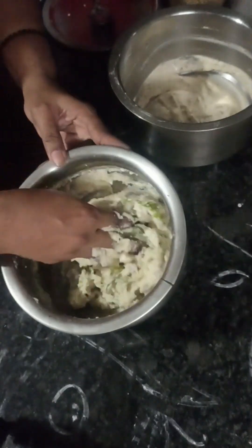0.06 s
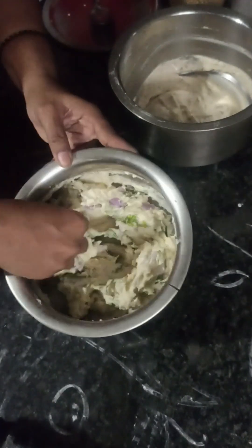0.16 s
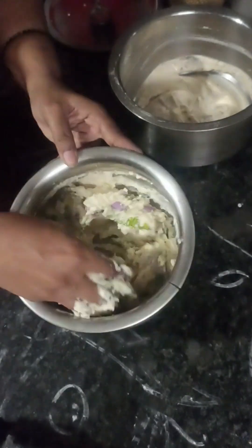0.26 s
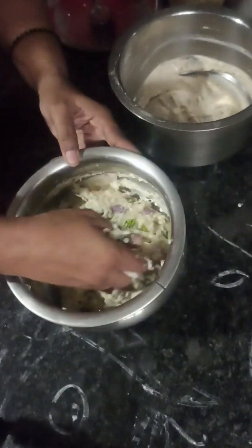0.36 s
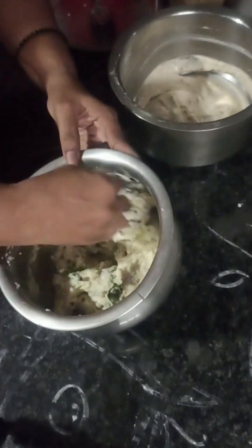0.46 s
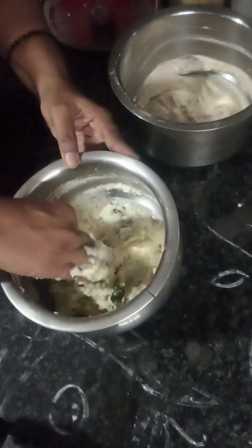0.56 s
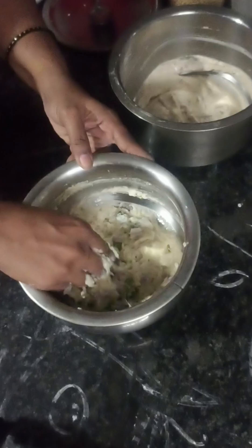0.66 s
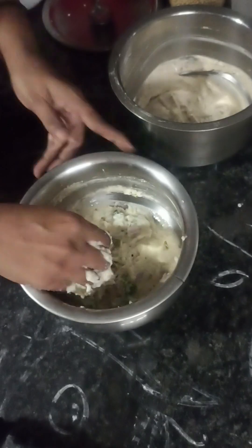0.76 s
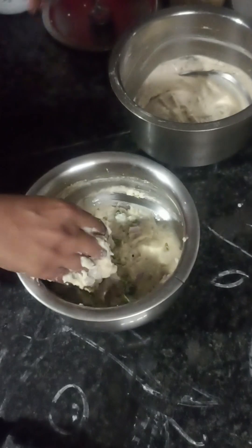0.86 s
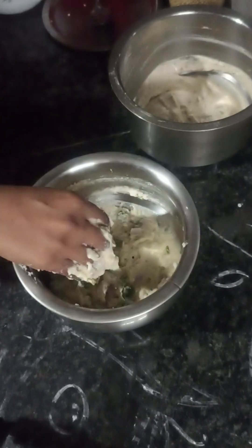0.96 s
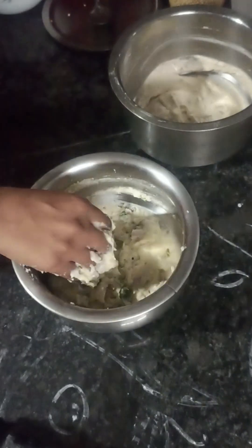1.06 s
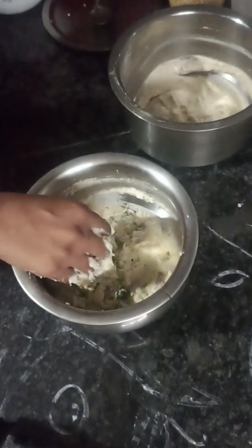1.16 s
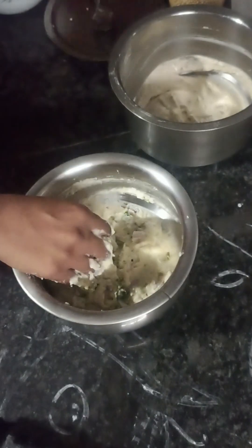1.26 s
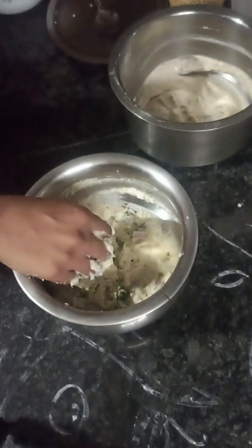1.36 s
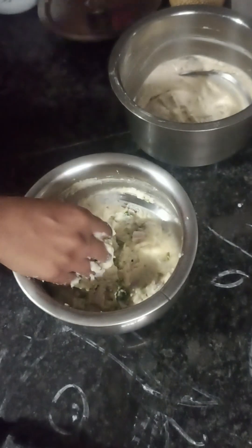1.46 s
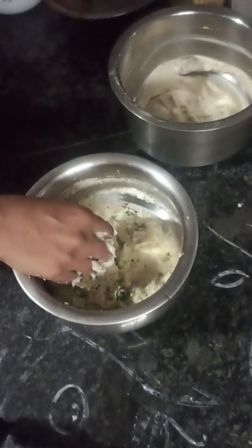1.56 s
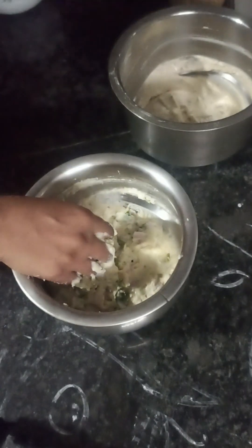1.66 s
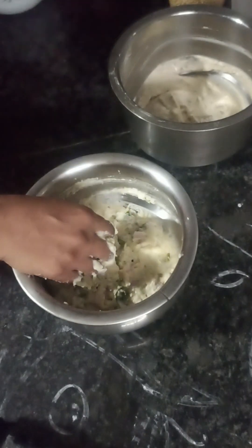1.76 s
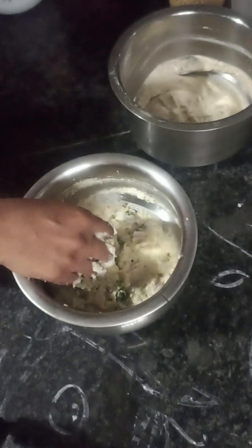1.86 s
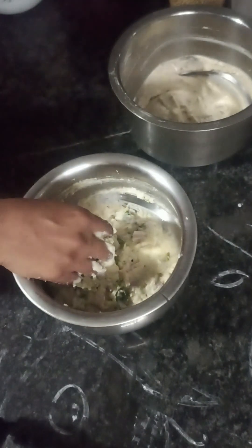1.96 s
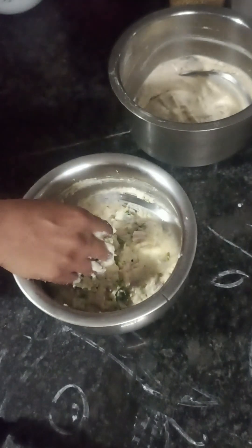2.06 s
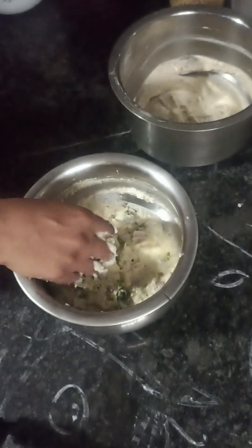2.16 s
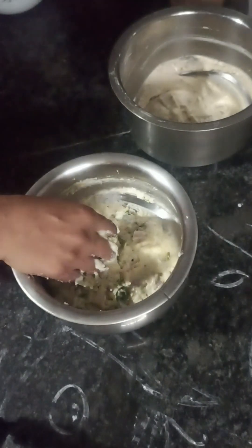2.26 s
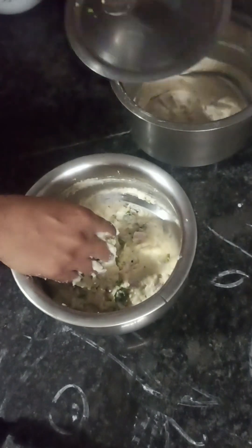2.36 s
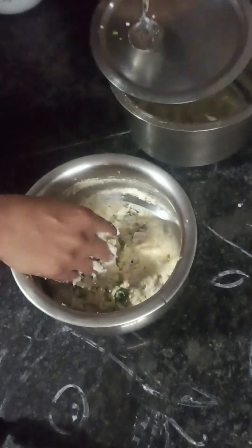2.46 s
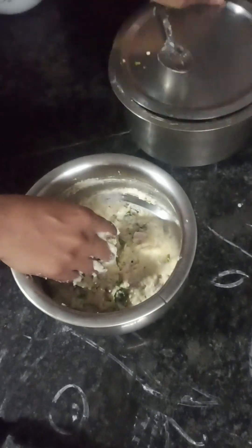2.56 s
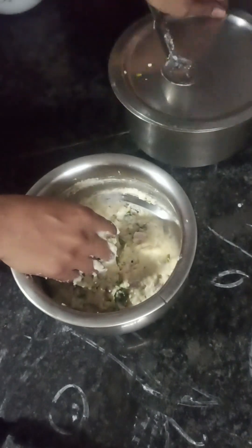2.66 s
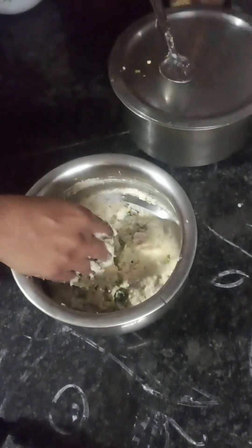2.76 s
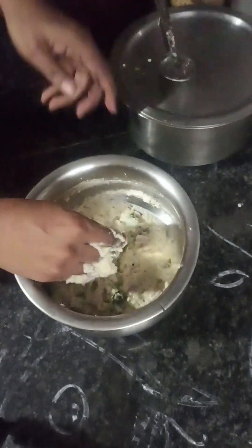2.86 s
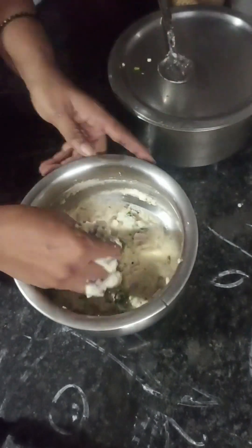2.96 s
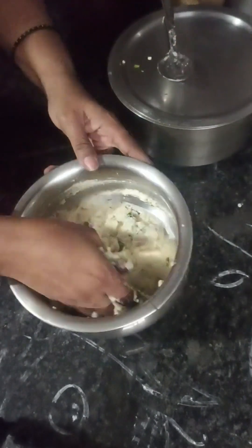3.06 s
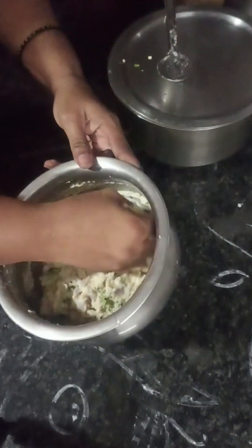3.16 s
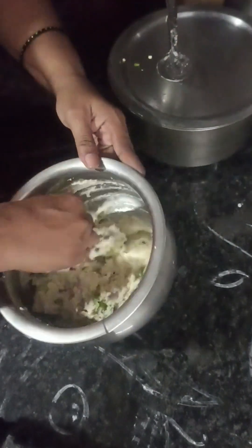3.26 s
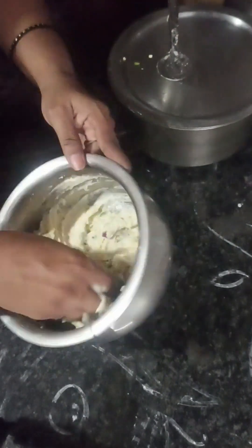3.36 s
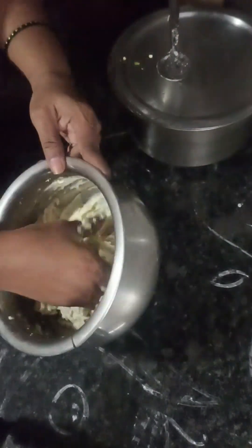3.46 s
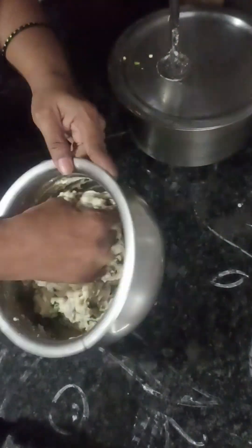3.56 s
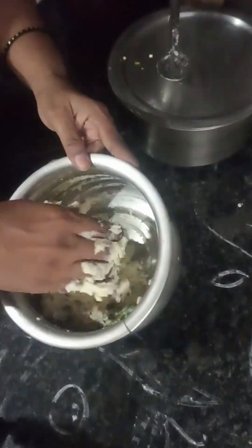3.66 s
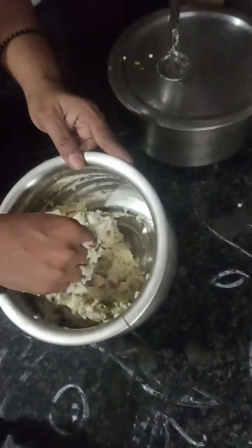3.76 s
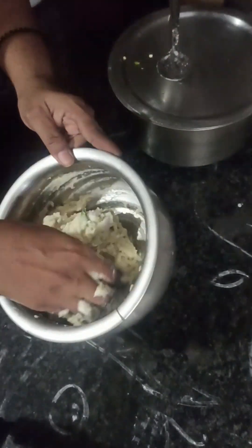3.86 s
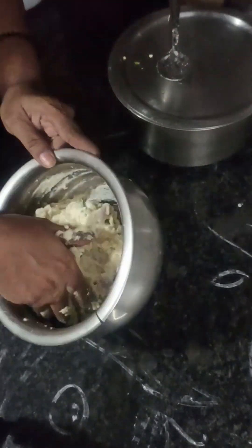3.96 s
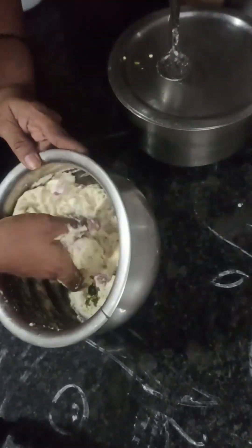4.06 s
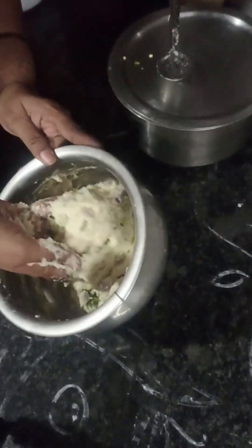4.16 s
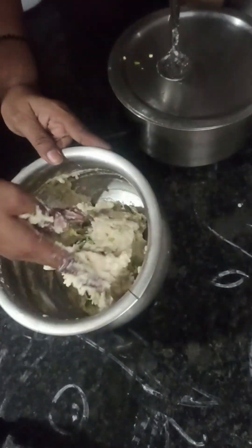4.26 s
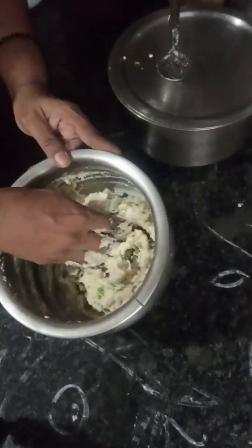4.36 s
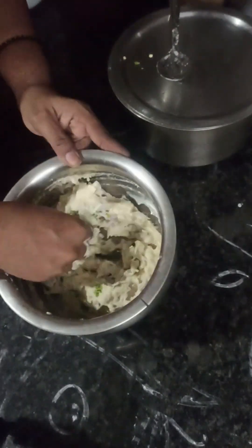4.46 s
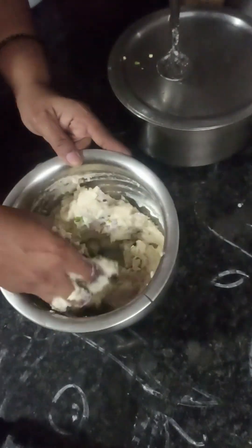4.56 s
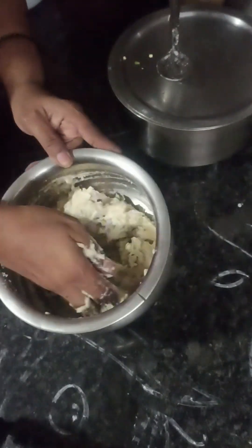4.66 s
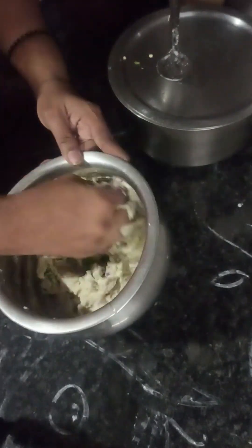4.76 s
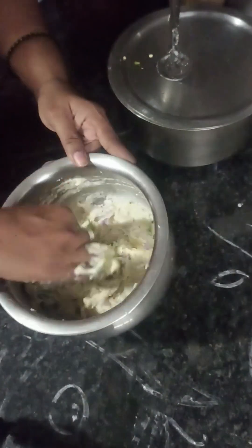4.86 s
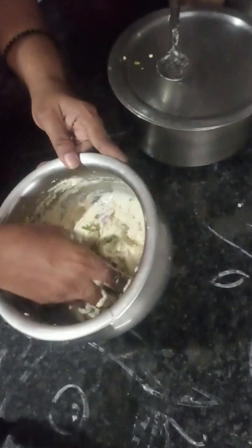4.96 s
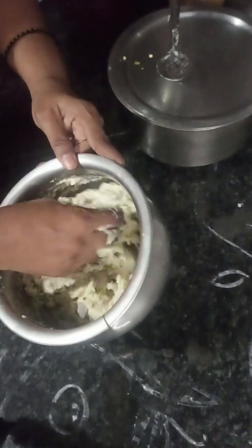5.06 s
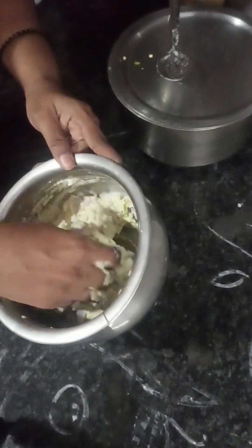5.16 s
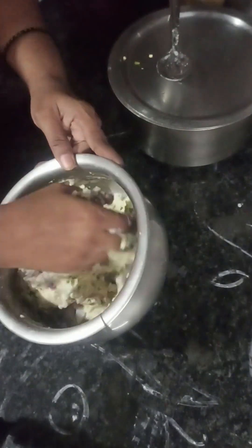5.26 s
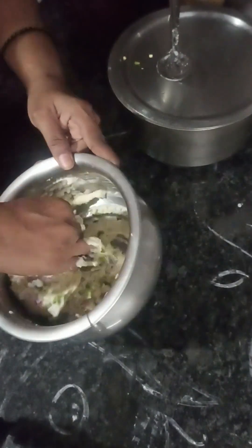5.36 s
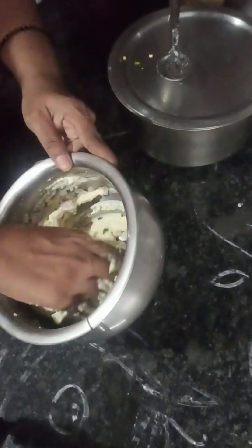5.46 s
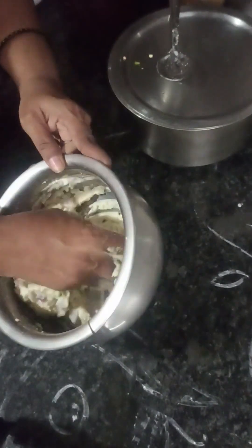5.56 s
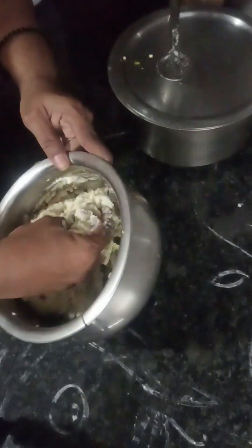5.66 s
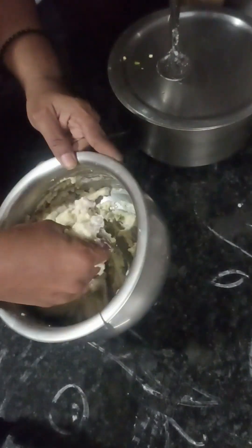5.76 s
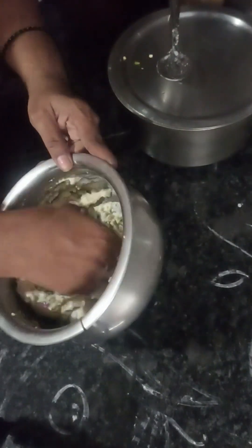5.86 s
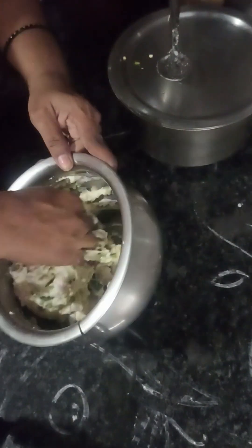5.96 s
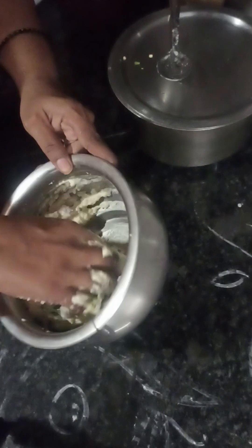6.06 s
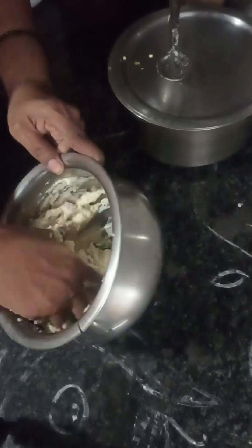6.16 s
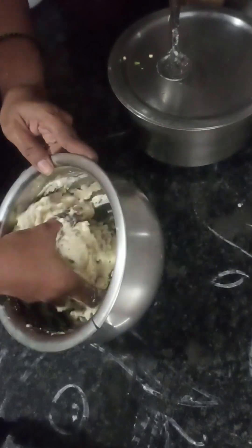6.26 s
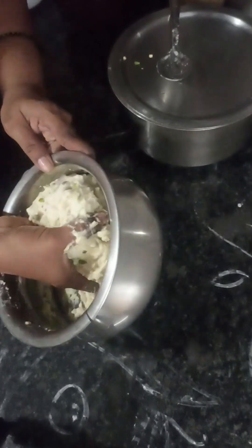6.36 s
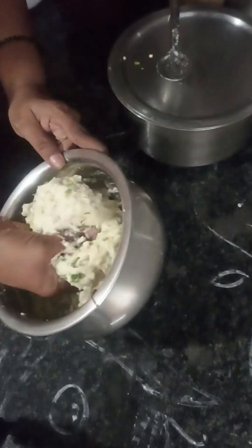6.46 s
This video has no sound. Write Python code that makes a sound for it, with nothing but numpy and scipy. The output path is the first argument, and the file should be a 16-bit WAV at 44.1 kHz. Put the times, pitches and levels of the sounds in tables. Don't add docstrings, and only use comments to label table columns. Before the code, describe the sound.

A small kitchen with a steady, low room hum, heard from within arm's reach in stereo. From 0 to 0.9 s a hand kneads thick batter: faint sticky crackles, tiny wet snaps and a dull low bowl thud at 0.7. A faint bird trills far outside at about 0.8 and 1.7. From 1.2 to 1.6 a spoon buzzes and ticks on a steel lid, slightly left. At 2.0 the lid gives a sharp bright double knock, slightly right. It touches the pot dully at 2.45, then drops at 2.53 to 2.7, the loudest clatter, low pot ring under bright shimmer. The bowl thuds firmly around 3.0. Soft kneading resumes until 6.4, with sparse wet snaps, peeling films and small hollow pops, while distant bird chirps run mostly from 3.6 to 4.5. At 6.49 a heavy metal slam starts and is cut off.

```python
import sys
import numpy as np
from scipy import signal
from scipy.fft import rfft, irfft, next_fast_len
from scipy.io import wavfile
from scipy.ndimage import uniform_filter1d

SR = 44100
rng = np.random.default_rng(int(sys.argv[2]) if len(sys.argv) > 2 else 0)


def store_wav(level_fs):
    pcm = np.round(np.clip(np.atleast_2d(level_fs), -1, 1) * 32767)
    wavfile.write(sys.argv[1], SR, pcm.T.astype(np.int16))


def ratio(d):
    e = np.asarray(d, float) / 20
    return 10 ** e


N = 286650


def read(points, hz):
    f, value = np.transpose(points)
    return np.interp(np.log(hz + 1), np.log(f + 1), value)


def evened(x):
    return x / np.sqrt(np.mean(x ** 2) + 1e-20)


def unit(x):
    return x / np.linalg.norm(x)


def add(mix, s, sound):
    part = mix[..., round(s * SR):][..., :sound.shape[-1]]
    part += sound[..., :part.shape[-1]]


def diffuse(likeness):
    a, b = rfft(rng.standard_normal((2, N)))
    same = np.clip(read(likeness, np.fft.rfftfreq(N, 1 / SR)), -1, 1)
    return irfft([a, same * a + np.sqrt(1 - same ** 2) * b], N)


def coloured(x, taps):
    return signal.oaconvolve(x, taps[None], axes=1)[:, :N]


def halves(x, hz):
    return [signal.sosfilt(signal.butter(4, hz, side, fs=SR, output="sos"), x) for side in ("low", "high")]


def whistle(pitch, level):
    return level * np.sin(2 * np.pi * np.cumsum(pitch) / SR)


def response(tone, rings=(), ring_db=0.):
    hz = np.fft.fftfreq(8192, 1 / SR)
    log_gain = read(tone, abs(hz)) * np.log(10) / 20
    body = np.exp(log_gain - 1j * signal.hilbert(log_gain).imag)
    taps, t = unit(np.fft.ifft(body).real[:4096]), np.arange(4096) / SR
    for (f, width, db), extra_db in zip(rings, ring_db * np.ones(len(rings))):
        ring = np.exp(-np.pi * width * t) * np.sin(2 * np.pi * f * t)
        taps = taps + ratio(db + extra_db) * unit(ring)
    return unit(taps)


# freq_hz, level_db per Hz
HUM = [(18, -48.5), (30, -22), (134, -1.0), (413, 1.5), (509, -7.5), (838, -4.0), (1310, -10.5),
       (3450, -16), (3830, -27.0), (6650, -26.5), (7780, -35), (9860, -46.0), (12200, -49.0), (15800, -60),
       (16500, -22)]
# freq_hz, width_hz, level_db
HUM_MODES = [(163, 9.1, -8.5), (214.8, 8, -6), (275, 210, -40), (316, 61, -9.5), (424.6, 9.6, -13),
             (760, 410, -17)]
# freq_hz, likeness
SAME = [(60, 0.9), (180, 1), (550, 0.46), (1650, -0.13), (4970, -0.039), (15000, 0.083)]


def kitchen():
    swell = evened(uniform_filter1d(uniform_filter1d(rng.standard_normal(N), 2500), 2500))
    return ratio(-52 + 0.2 * swell) * coloured(diffuse(SAME), response(HUM, HUM_MODES, -4.0))


# time_s,
# level_db
KNEAD = [(0.0, -68.5), (0.72, -67.5), (0.92, -73), (1.16, -72), (1.23, -65.5), (1.5, -60), (1.63, -70.5),
         (1.99, -68), (2.35, -71.5), (2.62, -52), (2.73, -63.5), (2.82, -71), (2.95, -66), (3.11, -68),
         (3.87, -70.5), (4.13, -68.5), (6.04, -69), (6.5, -68)]


def kneading():
    return ratio(np.interp(np.arange(N) / SR, *np.transpose(KNEAD)))


# freq_hz, level_db per Hz
STICKY = [(880, -28), (1500, 10), (1810, 8.5), (3060, -2.5), (3310, 0.5), (3620, 1.5), (3810, -2.5),
          (7460, -10), (12400, -3), (16000, -17)]
# start_s, peak_db, dull_db re peak
SNAPS = [(0.1416, -56, -18), (0.239, -54, -15), (0.2614, -64, -19), (0.5333, -55, -9), (0.5652, -44.5, -33),
         (0.6995, -46.5, -24), (2.86, -53, -15), (2.898, -50, -24), (3.1613, -55, -18), (3.2675, -51, -20),
         (3.3056, -58.5, -4), (3.621, -50, -18), (3.6426, -53, -20), (3.6656, -45, -34), (3.8382, -56, -16),
         (3.9853, -58, -10), (4.0326, -60, -3), (4.067, -49.5, -9), (4.1091, -46, -9), (4.25, -52.5, -10),
         (4.5526, -61, -19), (4.5945, -48.5, -21), (0.6285, -58, -22), (1.926, -56, -22),
         (4.6409, -62, -14), (4.9831, -57, -16), (5.1542, -54, -19), (4.8554, -52, -18), (4.9147, -53, -20),
         (5.1696, -54, -22), (5.407, -53, -7), (5.9838, -58, -8), (6.0312, -54, -15)]
# start_s, peak_db, dull_db re peak, peel_s
PEELS = [(0.4808, -57, -3, 0.013), (0.8494, -59, -18, 0.039), (1.6214, -45, -32, 0.0026),
         (1.6456, -33.5, -47, 0.005), (1.818, -45.5, -32, 0.015), (2.697, -54, 7, 0.0027),
         (2.756, -43, -7.5, 0.0046), (2.7755, -67, -18, 0.0018), (2.9418, -39.5, -29, 0.0024),
         (2.9644, -54, -23, 0.007), (3.502, -74, 19, 0.0081), (4.7301, -56, -11, 0.037),
         (5.0914, -59.5, 4, 0.014), (6.2317, -72, 18.5, 0.019)]


def batter():
    snap_peel_s = 0.0011
    effort, t = kneading(), np.arange(SR // 4) / SR
    grains = ratio(0.45 * np.minimum(rng.exponential(1, N), 5)) * (rng.random(N) < 250 / SR)
    clumps = evened(signal.lfilter([1], [1, -np.exp(-1 / (0.02 * SR))], grains) + 1.5)
    bright, dull, cracks = effort * clumps, 0.67 * effort * clumps, np.zeros(N)
    for s, db, dull_db, peel in [*[(*row, snap_peel_s) for row in SNAPS], *PEELS]:
        wet_t60 = 0.052 + 4.2 * peel
        wet = ratio(-60 * np.maximum(t - peel, 0) / max(wet_t60, .005)) * (1 - np.exp(-t / (0.072 * peel)))
        burst = ratio(db - 8.5) * (wet + 0.69 * np.exp(-t / 0.002))
        add(bright, s, burst)
        add(dull, s, ratio(dull_db) * burst)
        if peel == snap_peel_s:
            add(cracks, s, ratio(db + dull_db + 21.0) * np.hanning(5))
    low, high = halves(diffuse(SAME), 5400)
    return coloured(bright * high + 2.0 * dull * low, response(STICKY)) - cracks


def tearing():
    out, t = np.zeros((2, N)), np.arange(200) / SR
    size = kneading() * ratio(2.2 * np.minimum(rng.exponential(1, N), 3)) * (rng.random(N) < 70 / SR)
    kind = rng.integers(0, 7, N)
    for k, hz in enumerate(np.geomspace(5500, 15000, num=7)):
        tick = rng.standard_normal((2, 200)) * np.exp(-t / 0.0012)
        band = signal.butter(1, [hz * .8, hz * 1.2], "band", fs=SR, output="sos")
        tick = signal.sosfilt(band, tick)
        tick = tick / np.linalg.norm(tick[0])
        out += ratio(14.5) * signal.oaconvolve((size * (kind == k))[None], tick, axes=1)[:, :N]
    return out


# start_s, peak_db, pitch_hz, t60_s
THUDS = [
    (0.267, -47, 164, 0.091),
    (0.712, -37.5, 153, 0.15),
    (2.987, -36.5, 154, 0.086),
    (3.023, -29, 166, 0.11),
    (3.071, -36.5, 153, 0.19),
    (3.492, -54.5, 149, 0.79),
    (4.215, -63, 200, 0.084),
]


def bowl():
    out, t = np.zeros(N), np.arange(SR // 3) / SR
    for s, db, hz, t60 in THUDS:
        overtone = 0.77 * np.sin(2 * np.pi * 1.25 * hz * t) * ratio(-60 * t / 0.061)
        ring = np.sin(2 * np.pi * hz * t) + overtone
        add(out, s, ratio(db - 60 * t / t60) * ring * (1 - np.exp(-t / 0.0042)))
    return out


# start_s, peak_db, pitch_hz, t60_s
POPS = [(3.5015, -43.5, 600, 0.026), (5.095, -51, 2450, 0.03), (4.8648, -46, 1460, 0.016),
        (5.3477, -50, 3020, 0.016), (5.4998, -52, 1050, 0.022), (5.6144, -49, 1020, 0.023),
        (5.671, -49.5, 1600, 0.028), (6.2507, -46, 1390, 0.018), (0.4898, -44.5, 2870, 0.014),
        (5.3644, -51.5, 3100, 0.024), (5.9928, -58, 3170, 0.025)]


def pops():
    out, t = np.zeros(N), np.arange(3000) / SR
    for s, db, hz, t60 in POPS:
        note = np.sin(2 * np.pi * hz * (t + 4.3 * t ** 2)) * (1 - np.exp(-t / 0.00088))
        add(out, s, ratio(db + 3.0 - 60 * t / t60) * note)
    return out


def trill(length, db, hz):
    rise_s, pulses_per_s, dip_db, fade_db_per_s = 0.05, 15, 4, 55
    t = np.arange(0, length, 1 / SR)
    rise, late = np.minimum(t / rise_s, 1), np.maximum(t - rise_s, 0)
    dips_db = dip_db * np.sin(np.pi * pulses_per_s * late) ** 2
    level = np.sqrt(rise) * ratio(db - dips_db - fade_db_per_s * late)
    return whistle(hz * (1 - 0.035 * (1 - rise)), level)


CHIRP_S = 0.036


def chirp(db, hz, tail_db):
    tail_s = 0.03
    t = np.arange(0, CHIRP_S + tail_s, 1 / SR)
    top, tail = np.minimum(t / CHIRP_S, 1), np.clip((t - 0.75 * CHIRP_S) / tail_s, 0, 1)
    arch = 0.04 + 0.05 * (hz > 3270)
    pitch = hz * (1 - arch * (2 * top - 1) ** 2 - 0.22 * tail)
    level = np.sin(np.pi * top) + ratio(tail_db) * np.sin(np.pi * tail ** 1.6)
    return whistle(pitch, ratio(db) * level)


# start_s, length_s, peak_db, pitch_hz
TRILLS = [
    (0.77, 0.29, -59.5, 3390),
    (1.705, 0.24, -64, 2590),
]
# centre_s, peak_db, pitch_hz, tail_db re peak
CHIRPS = [(2.168, -59, 3160, -20), (2.207, -60, 3170, -22), (2.362, -57, 3130, -22), (3.6, -58, 3130, -5),
          (3.675, -61, 3070, 1), (3.76, -62, 3040, 4), (3.855, -66, 3070, 8), (3.954, -58, 3140, -1),
          (4.038, -60, 3070, -14), (4.114, -59, 3160, 2), (4.204, -54, 3200, -1.5),
          (4.294, -53.5, 3180, -12), (4.384, -55, 3330, -14), (4.467, -57, 3270, -19),
          (4.615, -76, 3000, 15)]


def bird():
    out = np.zeros(N)
    for s, *note in TRILLS:
        add(out, s, trill(*note))
    for s, *note in CHIRPS:
        add(out, s - CHIRP_S / 2, chirp(*note))
    flutter = evened(uniform_filter1d(rng.standard_normal(N), round(0.006 * SR)))
    out = out * ratio(3 * flutter)
    echoes = rng.standard_normal((2, 3000)) * ratio(-60 * np.arange(3000) / (.15 * SR))
    echoes = echoes / np.linalg.norm(echoes[0])
    return 0.7 * out + 0.5 * signal.oaconvolve(out[None], echoes, axes=1)[:, :N]


# freq_hz, likeness
SAME_METAL = [(60, 0.98), (180, 1), (550, 0.66), (1650, -0.48), (4970, 0.067), (15000, 0.035)]


def chatter():
    bounces = ratio(1.8 * evened(uniform_filter1d(rng.standard_normal(N), 70)))
    return np.pad(diffuse(SAME_METAL) * bounces, ((0, 0), (0, SR // 4)))


# contact_s, release_t60_s, tail_t60_s at -40 dB,
# tail growth per dB of peak, share landing at once
STRIKE_GRIP = (0.0006, 0.004, 0.04, 0, 1.2)


def steel(noise, rows, grip, tone, rings, ring_db, favour_db, tail_db, pan_db):
    contact, release, usual_t60, growth, sudden = grip
    out, t = np.zeros((2, N)), np.arange(SR // 4 if contact > .002 else SR // 20) / SR
    ring_hz, spots = np.array([ring[0] for ring in rings]), rng.standard_normal((len(rows), len(rings)))
    plate = unit(rng.standard_normal(SR // 20) * ratio(-60 * t[:SR // 20] / 0.03))
    for (s, db, body_db, hz), spot in zip(rows, spots):
        t60 = usual_t60 * np.exp(growth * (db + 40))
        after = np.maximum(t - contact, 0)
        shape = ratio(-60 * after / max(release, .002)) + ratio(tail_db - 60 * after / max(t60, .02))
        shape = shape * (1 - np.exp(-t / (0.078 * contact)))
        blow = ratio(db - 9.5) * shape * noise[:, round(s * SR):][:, :len(t)]
        landing = sudden * np.linalg.norm(blow[0]) * (t == 0)
        gripped = [(f * (1 + 0.012 * np.tanh(v)), width * (1 + 0.2 * f / 1000), level)
                   for (f, width, level), v in zip(rings, spot[::-1])]
        near = np.exp(-(np.log2(ring_hz / hz) / .22) ** 2)
        woken_db = ring_db + 1.5 * spot + favour_db * near
        low, high = halves(response(tone, gripped, woken_db), 1290)
        high = high + 0.36 * signal.oaconvolve(high, plate)[:len(high)]
        add(out, s, coloured(blow + landing, unit(high)))
        add(out, s, coloured(1.55 * blow + 2.0 * landing, ratio(body_db) * unit(low)))
    return out * ratio(np.array([[pan_db / 2], [-pan_db / 2]]))


# start_s, peak_db, body_db re peak, favoured_hz
RATTLE = [(1.193, -46.5, -31, 13450), (1.2244, -53, -23, 13450), (1.263, -44, -27, 13450),
          (1.285, -33.5, -22, 3400), (1.2865, -37.5, -14, 1620), (1.3194, -42, -21, 1710),
          (1.364, -37.5, -4, 1710), (1.3856, -39.5, -2.5, 1225), (1.424, -46, -1, 13450),
          (1.496, -48.5, -18, 13450), (1.5294, -46.5, -26, 13450), (1.5494, -46, -15, 13450),
          (1.5744, -60, -7, 13450)]
# start_s, peak_db, body_db re peak, favoured_hz
RATTLE_STRIKES = [(1.2908, -39, -13, 3400), (1.2973, -36, -17, 2455), (1.301, -47, -17, 5620),
                  (1.323, -34, -10, 1548), (1.3712, -39, -8, 2960), (1.3847, -39, 4, 1225),
                  (1.392, -41, -2, 1710), (1.3954, -43, -1, 1225), (1.4, -46, -4, 5620),
                  (1.4105, -49, -10, 3400), (1.429, -38, -14, 6500), (1.4356, -44, -8, 1225)]
# freq_hz, level_db per Hz
RATTLE_TONE = [(400, -37), (900, -19), (1500, -11), (3000, 1), (6000, -9.5), (9000, -11.5), (13000, -16.5),
               (16000, -19)]
# freq_hz, width_hz, level_db
RATTLE_RINGS = [(726, 22, -4), (1225, 22, 0.5), (1548, 26, -4), (1710, 25, 3), (2455, 46, 2),
                (2960, 42, -4), (3460, 63, -1.5), (5620, 46, -10), (6500, 50, -5), (10800, 200, -11),
                (12160, 270, -12), (13450, 110, -12), (14800, 220, -22)]
# contact_s, release_t60_s, tail_t60_s at -40 dB, tail growth per dB of peak, share landing at once
RATTLE_GRIP = (0.015, 0.078, 0.26, 0.068, 0.11)


def rattle(noise):
    buzz = steel(noise, RATTLE, RATTLE_GRIP, RATTLE_TONE, RATTLE_RINGS, -9, 8, -6, 2.4)
    return buzz + steel(noise, RATTLE_STRIKES, STRIKE_GRIP, RATTLE_TONE, RATTLE_RINGS, -8, 8, -25, 2.4)


# start_s, peak_db, body_db re peak, favoured_hz
KNOCK = [
    (2.0053, -20, -19.5, 2700),
    (2.013, -29, -21, 1420),
    (2.038, -39, -16, 3750),
    (2.062, -46, -10, 6500),
]
# start_s, peak_db, body_db re peak, favoured_hz
KNOCK_STRIKES = [
    (2.0072, -21, -9, 2700),
    (2.0125, -30, -19, 2020),
    (2.0208, -20.5, -20, 2700),
    (2.0265, -32, -8, 2700),
    (2.041, -35, -18, 3750),
]
# freq_hz, level_db per Hz
KNOCK_TONE = [(120, -55), (200, -40), (473, 12), (1420, -2), (2020, -7), (2700, 0), (3900, -2),
              (16000, -10)]
# freq_hz, width_hz, level_db
KNOCK_RINGS = [(440, 100, 2.5), (1440, 48, -12), (2020, 110, -4), (2700, 85, -0.5), (2870, 21, -9),
               (3160, 44, -9), (3750, 74, -8), (4200, 39, -16), (4480, 26, -17), (5450, 35, -20),
               (5900, 57, -18), (6800, 32, -13), (7500, 48, -28), (7900, 46, -23)]
# contact_s, release_t60_s, tail_t60_s at -40 dB, tail growth per dB of peak, share landing at once
KNOCK_GRIP = (0.014, 0.037, 0.24, 0.0042, 0.02)


def knock(noise):
    clatter = steel(noise, KNOCK, KNOCK_GRIP, KNOCK_TONE, KNOCK_RINGS, -9, 3, -8, -1.9)
    return clatter + steel(noise, KNOCK_STRIKES, STRIKE_GRIP, KNOCK_TONE, KNOCK_RINGS, -6, 7, -25, -1.9)


# start_s, peak_db, body_db re peak, favoured_hz
TOUCH = [
    (2.445, -33, 5, 500),
    (2.4492, -31.5, -0.5, 800),
    (2.4589, -37.5, 7, 484),
    (2.5044, -51, 10, 490),
]
# freq_hz, level_db per Hz
TOUCH_TONE = [(120, -53), (200, -11), (500, 3), (1000, -23), (2800, -20), (4040, -20.5), (12600, -28.5),
              (16000, -44)]
# freq_hz, width_hz, level_db
TOUCH_RINGS = [(376, 27, -1.5), (484, 37, 1.5), (793, 11, -5.5), (1240, 29, -17), (1444, 21, -15),
               (1690, 29, -13.5), (2270, 24, -16), (2815, 29, -13), (3070, 39, -23), (3500, 96, -19)]
# contact_s, release_t60_s, tail_t60_s at -40 dB, tail growth per dB of peak, share landing at once
TOUCH_GRIP = (0.002, 0.055, 0.19, -0.038, 0.1)


def touch(noise):
    return steel(noise, TOUCH, TOUCH_GRIP, TOUCH_TONE, TOUCH_RINGS, 1.7, 1.9, -5.0, -0.5)


# start_s, peak_db, body_db re peak, favoured_hz
DROP = [(2.533, -27.5, -16, 330), (2.539, -23, -16, 347), (2.5461, -22, 5.5, 422), (2.557, -18.5, -4, 500),
        (2.5686, -18.5, 1, 550), (2.584, -18, -29, 423), (2.5938, -18, -28, 2890), (2.6154, -20.5, 0, 346),
        (2.6308, -28.5, -1, 285), (2.641, -22.5, -1.5, 420), (2.658, -35.5, 4, 207), (2.6694, -39, -4, 275),
        (2.69, -51.5, 15, 285), (2.748, -48, 13, 317)]
# start_s, peak_db, body_db re peak, favoured_hz
DROP_STRIKES = [(2.5474, -23.5, 13.5, 422), (2.5519, -18.5, 1, 3480), (2.555, -22, 9, 476),
                (2.5713, -28, 1, 548), (2.5792, -24, 11, 1280), (2.592, -29, -5, 2890),
                (2.599, -21, -17, 4930), (2.607, -15, -2, 2890), (2.621, -25, 0, 5330),
                (2.627, -32, -7, 2890), (2.6402, -23.5, 6, 2890), (2.6452, -22.5, 3.5, 342),
                (2.6635, -31, 5, 285), (2.678, -35, 5, 216)]
# freq_hz, level_db per Hz
DROP_TONE = [(35, -37), (60, -4), (146, -44), (238, 4), (417, 3), (946, -6.5), (1280, -8.5), (1780, -10.5),
             (2970, -14.5), (3850, -20.5), (12400, -20), (16000, -36)]
# freq_hz, width_hz, level_db
DROP_RINGS = [(160.2, 10.4, 7.5), (216, 11, -2), (285, 25, 0), (342, 25, 5), (422, 31, 5.5), (476, 23, 2.5),
              (548, 22, -0.5), (793, 26, -0.5),
              (1104, 37, -4), (1280, 22, 0), (2190, 42, -10), (2360, 13, -11), (2890, 80, -6.5),
                (3480, 50, -4.5), (4250, 33, -8), (4660, 46, -6.5), (4930, 29, -14), (5330, 16, -6.5),
                (5630, 39, -8.5), (6510, 180, -6), (7260, 18, -10.5), (8150, 33, -19)]
# contact_s, release_t60_s, tail_t60_s at -40 dB, tail growth per dB of peak, share landing at once
DROP_GRIP = (0.009, 0.064, 0.42, -0.033, 0.16)


def drop(noise):
    lid = DROP_RINGS
    wobble = steel(noise, DROP, DROP_GRIP, DROP_TONE, lid, -14.0, 19.4, -14.0, -0.88)
    return wobble + steel(noise, DROP_STRIKES, STRIKE_GRIP, DROP_TONE, lid, -3.0, 14.0, -36.0, -0.97)


# start_s, peak_db, body_db re peak, favoured_hz
SLAM = [
    (6.4905, -21, -3, 1900),
    (6.4945, -21, 5, 500),
]
# freq_hz, level_db per Hz
SLAM_TONE = [(60, -5), (300, -7), (500, 20), (1900, -20), (5000, -17), (7500, -33), (12000, -50),
             (16000, -42)]
# freq_hz, width_hz, level_db
SLAM_RINGS = [(386, 76, 2), (1200, 110, -11), (1720, 91, -19), (1860, 90, -11), (2960, 100, -30)]


def slam(noise):
    return steel(noise, SLAM, KNOCK_GRIP, SLAM_TONE, SLAM_RINGS, -2.4, 5.0, -39.0, -1.3)


def scene():
    noise = chatter()
    metal = rattle(noise) + knock(noise) + touch(noise) + drop(noise) + slam(noise)
    metal = halves(metal, 144)[1]
    wet = ratio(0.5) * batter() + tearing() + pops()
    return kitchen() + wet + bowl() + bird() + ratio(-3.5) * metal


def band_limit(x):
    return signal.sosfilt(signal.butter(12, 16690, fs=SR, output="sos"), x)


# freq_hz, left_minus_right_db
PORTS = [(60, -9), (110, 1.5), (200, 1.5), (380, 2.5), (700, -1.5), (1290, -0.5), (2380, -0.5),
         (4400, -1.5), (8120, -2), (15000, 20)]


def record(dry):
    size = next_fast_len(N + 4096)
    hz = np.fft.rfftfreq(size, 1 / SR)
    tilt_db = read(PORTS, hz) / 2
    peak_db = 4.2 * np.exp(-np.maximum(hz - 11600, 0) / 1500)
    peak_db = peak_db / (1 + np.exp(np.minimum((11500 - hz) / 80, 50)))
    bass_cut = 1 / np.sqrt(1 + (50 / (hz + 1)) ** 8)
    edges = ratio(peak_db) * bass_cut * np.where(hz < 16030, 1, ratio(-37.0))
    longer = np.pad(dry, ((0, 0), (2048, size - N - 2048)), mode="reflect")
    gains = edges * ratio(np.array([tilt_db, -tilt_db]))
    mics = irfft(rfft(longer) * gains, size)[:, 2048:2048 + N]
    mics = .32 * np.tanh(mics / .32)
    return band_limit(mics)


dry = scene()
out = record(dry)
store_wav(out)
```